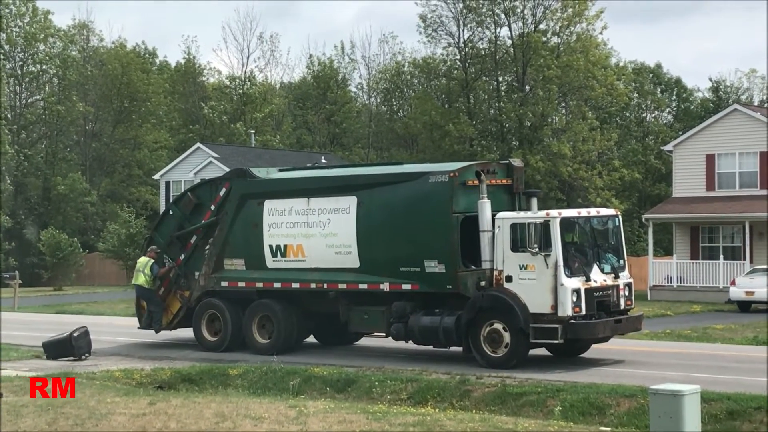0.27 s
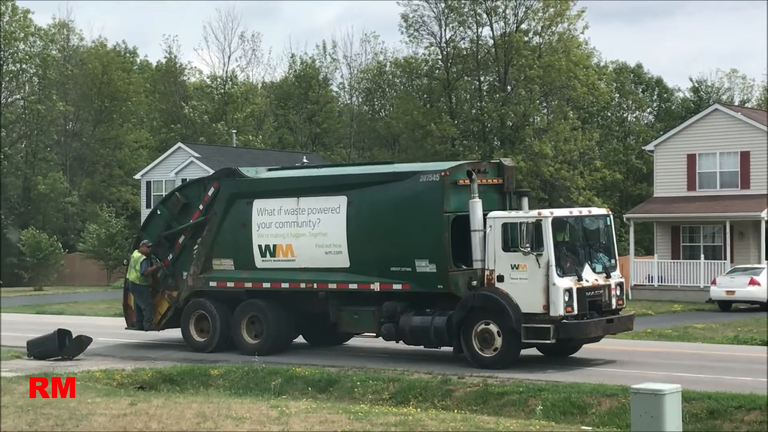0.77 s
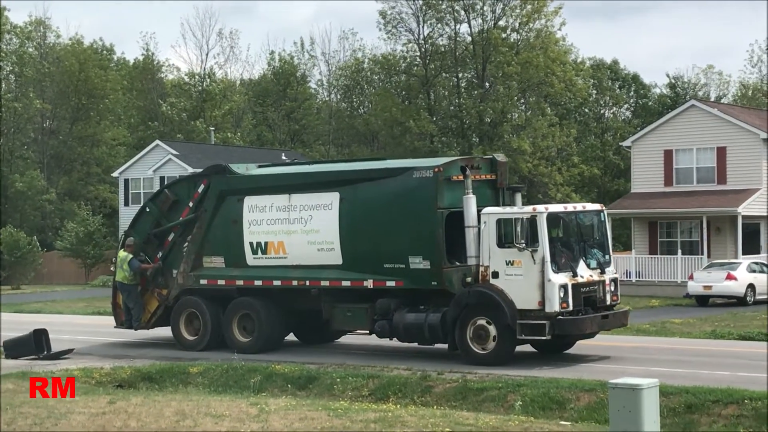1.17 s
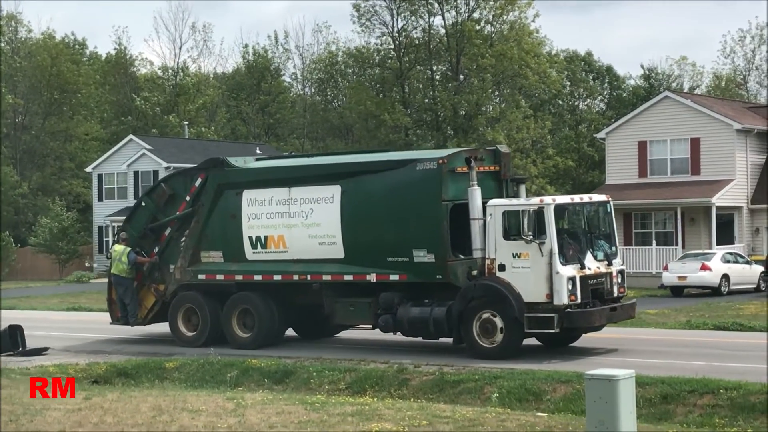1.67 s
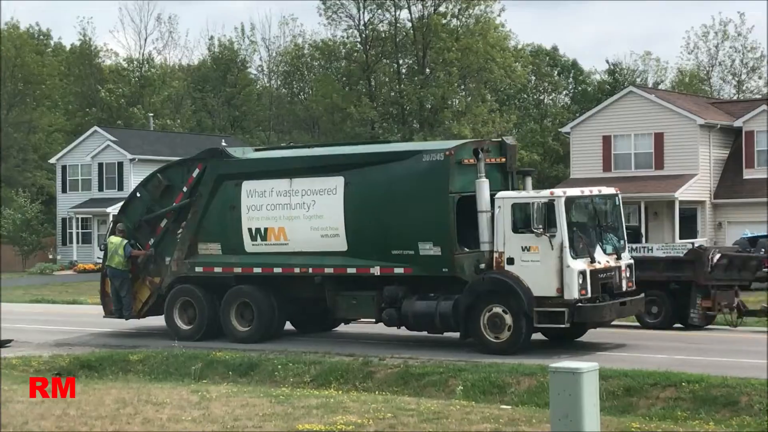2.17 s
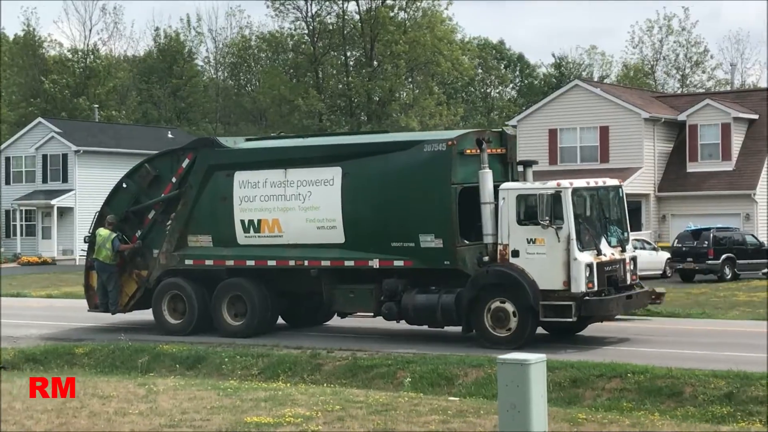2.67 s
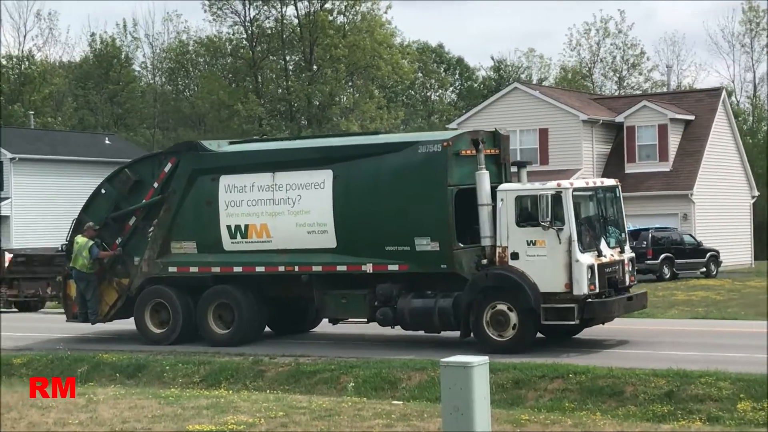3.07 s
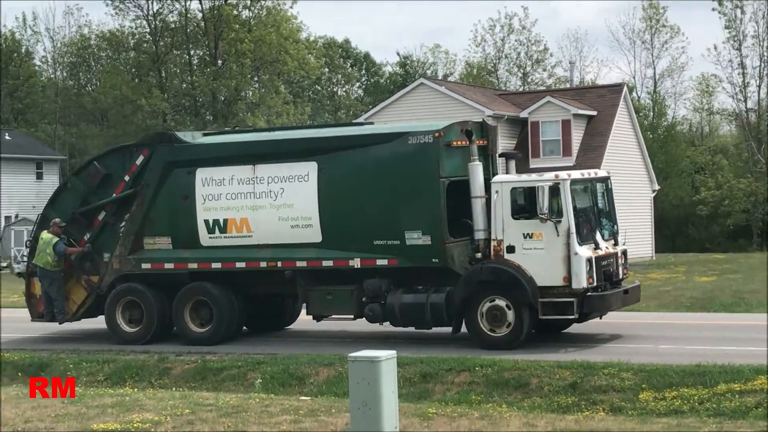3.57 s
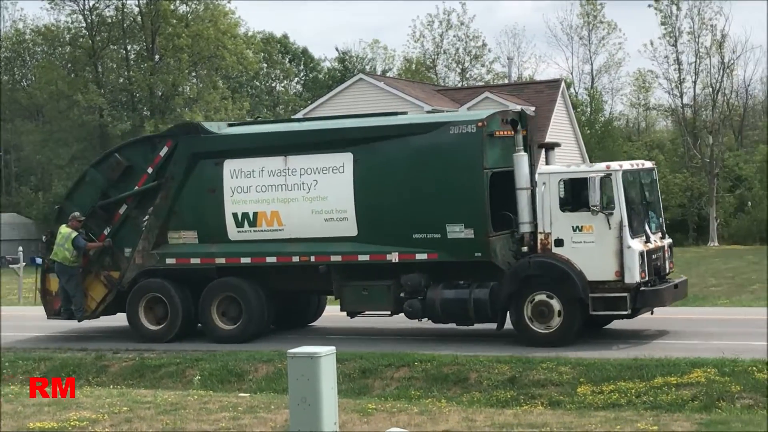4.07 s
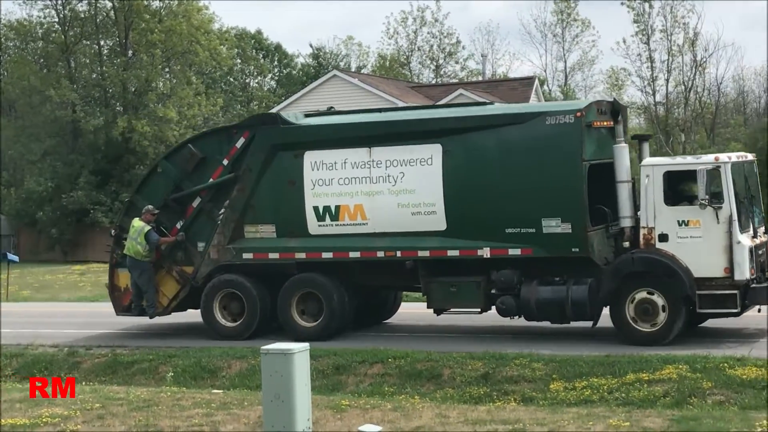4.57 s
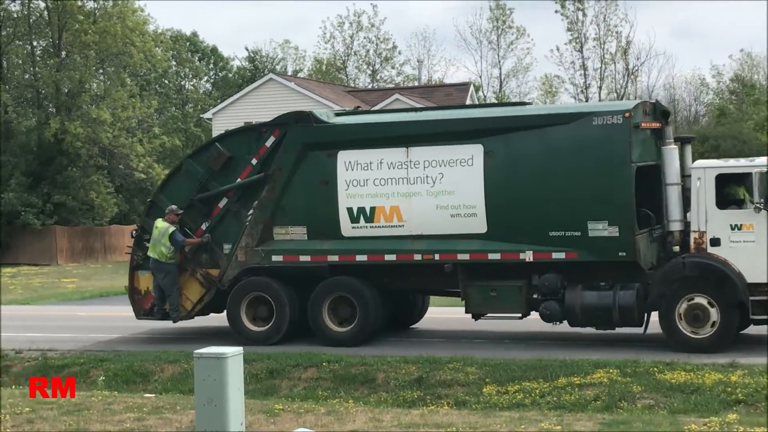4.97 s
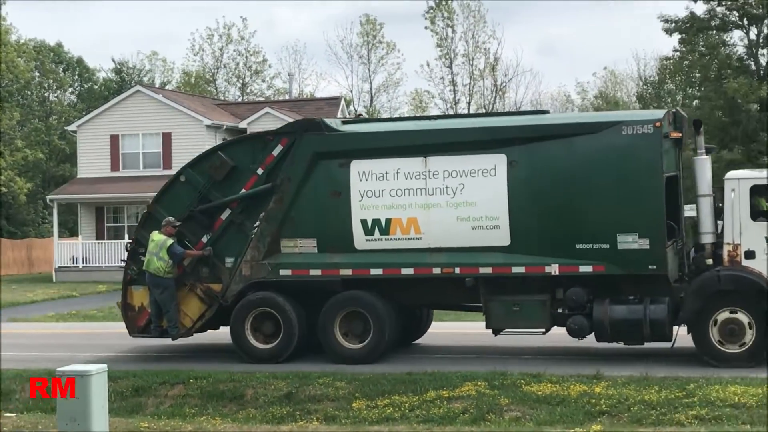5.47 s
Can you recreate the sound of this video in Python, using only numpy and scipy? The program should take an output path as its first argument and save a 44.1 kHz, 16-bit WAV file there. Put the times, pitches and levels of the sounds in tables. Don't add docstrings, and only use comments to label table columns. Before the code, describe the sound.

Heavy diesel truck accelerates along a suburban street, its deep hum rising after soft bumps, with one sharp steel knock, then easing off.

```python
import sys
import numpy as np
from scipy import signal
from scipy.fft import rfft, irfft, next_fast_len
from scipy.io import wavfile

SR = 44100
rng = np.random.default_rng(int(sys.argv[2]) if len(sys.argv) > 2 else 0)


def rack_gain(trim_db):
    fader = np.asarray(trim_db, float)
    return 10 ** (fader / 20)


def int16_out(signal):
    q = np.round(np.clip(np.atleast_2d(signal).T, -1, 1) * 32767)
    wavfile.write(sys.argv[1], SR, q.astype(np.int16))


N = 251811

# (frequency [Hz], density [dB per Hz])
STREET_SPECTRUM = [(18, -40), (30, -3.5), (60, -24.5), (110, -1.5), (150, -9), (200, -6.5), (300, -11.5),
                   (360, -35)]
STREET_DB = -56.5
# (time [s], pitch [Hz], level [dB])
LOW_DRONE_COURSE = [(0, 50.82, -48), (.5, 49.83, -47), (1, 49.62, -52.5), (1.35, 47.2, -53),
                    (1.7, 47.3, -45), (1.9, 47.25, -50), (2.3, 47.3, -48.5), (2.6, 46.8, -58),
                    (3, 45.7, -63.5), (4.72, 44.95, -62.5), (4.86, 45.73, -47), (5.02, 46, -53),
                    (5.25, 45.6, -43), (5.71, 40.7, -57)]
LOW_DRONE_LEAD_RAD = 1.4
SCUFF_EVERY_S, SCUFF_HALF_S, SCUFF_DB = .999, .053, -71

# (time [s], height [dB], frequency [Hz], decay by 60 dB [s])
BODY_BUMPS = [(0.172, -41.5, 140.4, 0.36), (0.18, -43, 81.4, 0.2), (0.2, -45, 234, 0.16),
              (0.62, -61, 229, 0.14), (2, -56, 530, 0.071), (3.4, -45, 332, 0.058), (0.016, -61, 670, 0.13),
              (0.018, -64, 1367, 0.12), (0.11, -66, 866, 0.23), (0.163, -61, 1205, 0.11),
              (0.205, -47, 100, 0.2), (0.182, -43, 100, 0.3), (0.198, -56, 675, 0.1),
              (1.445, -63, 1330, 0.1), (4.39, -66, 1600, 0.062)]
# (time [s], signed height [1], ring [Hz], crack [dB], bright edge [dB])
STEEL_TICKS = [
    (2.1731, 0.054, 553, 0, -10),
    (2.267, 0.0028, 1020, 8, 8),
    (2.322, -0.019, 980, 6.5, -7),
    (3.2496, 0.0037, 2320, 5, -19),
    (3.252, 0.0015, 2580, 6, -21),
]
TICK_T60_S = .012

# (start
# [s], end [s], start pitch [Hz], end pitch [Hz], level [dB])
WHISTLES_AND_WHINES = [(.65, 1.0, 3950, 3960, -83), (1.04, 1.3, 3950, 4010, -76.5), (1.28, 1.45, 3990, 4030, -80),
                       (1.6, 1.72, 4020, 4040, -80), (1.89, 2.32, 3980, 4000, -78), (1.54, 1.8, 4830, 4800, -79),
                       (1.1, 1.55, 4750, 4780, -85), (1.78, 2.25, 4820, 4780, -83), (1.24, 1.5, 3530, 3540, -82),
                       (1.66, 1.76, 3520, 3540, -80), (1.93, 2.25, 3740, 3820, -82), (2.36, 2.62, 4790, 4760, -82),
                       (2.84, 3.18, 4640, 4690, -85), (2.98, 3.08, 4900, 4840, -81), (3.32, 3.45, 4720, 4700, -82),
                       (.25, .62, 4290, 4320, -87), (.1, .7, 3980, 3950, -86), (1.15, 1.5, 4200, 4280, -82),
                       (1.46, 1.63, 4270, 4360, -79), (1.62, 1.95, 4250, 4400, -84), (1.4, 1.95, 4010, 4000, -85),
                       (2.95, 3.3, 3530, 3560, -81), (2.0, 2.62, 3600, 3610, -79.5), (2.5, 2.9, 4990, 5010, -84.5),
                       (2.62, 2.92, 4460, 4500, -85), (2.9, 3.16, 4510, 4540, -83), (2.4, 3.1, 2500, 2620, -85),
                       (2.9, 4.15, 2650, 2550, -83), (4.3, 4.62, 465, 505, -69.5), (4.3, 4.8, 7050, 7150, -95),
                       (-.1, 1.6, 670, 665, -79), (4.85, 5.8, 690, 680, -75), (3.3, 4.25, 640, 620, -79),
               (.05, .95, 950, 985, -82), (3.3, 3.8, 965, 1010, -80), (4.9, 5.7, 970, 960, -82),
               (4.4, 5.2, 1215, 1225, -84), (5.2, 5.75, 1190, 1130, -81), (-.1, .16, 1300, 1370, -83),
               (-.1, .25, 1560, 1570, -85), (4.3, 4.95, 1570, 1560, -83), (4.92, 5.06, 2480, 2650, -82),
               (4.55, 5.75, 3800, 3900, -86), (2.83, 3.15, 4140, 4210, -80.5), (4.4, 5.7, 2540, 2520, -87),
               (5.05, 5.75, 4250, 4200, -85)]
WHISTLE_WIDTH, WHISTLE_TONE = .01, .7
WHISTLE_BEAT = .25

# (frequency [Hz], width [Hz], level [dB])
BLOCK_MODES = [(2206, 220, -10.5), (2532, 515, -4.5), (3700, 1000, 1.5), (4055, 620, 4.5),
               (4570, 920, -3.5), (5360, 5260, -14)]
# (frequency [Hz], density [dB per Hz])
RUMBLE_SPECTRUM = [(200, -54), (340, 1), (388, -3), (529, -7.5), (649, -4), (733, -9), (1210, -11.5),
                   (1390, -14.5), (1590, -15.5), (2190, -19.5), (2400, -20), (3120, -38), (5280, -120)]
SHADE_S, SHADE_HALF_S, SHADE_DB = 2.75, .41, -1.5

# (frequency [Hz], width [Hz], level [dB])
PIPE_MODES = [(61, 22, 12), (109, 85, 4.5), (171, 58, -2), (218, 27, -2), (264, 26, -14), (300, 28, 2.5),
              (502, 110, -2.5)]
TAKE_UP_S, TAKE_UP_HALF_S, TAKE_UP_DB = .25, .11, 10.5
# (sixths of the firing rate [1], level
# [dB])
CYLINDER_LINES = [(3, 4.5), (4, -1), (7, 6), (8, -2), (9, 1.5), (10, -5), (11, 5.5), (13, 2), (14, -3.5),
                  (15, 2), (16, -3.5), (20, -2.5), (21, -13.5), (22, -8.5), (26, 1.5), (28, -6), (30, -2.5),
                  (32, -1.5), (34, -3.5), (36, -2.5), (40, -9.5), (42, -2.5), (48, -2.5)]
# (frequency [Hz], level [dB])
PIPE_COLOUR_CURVE = [(20, -101), (35, -79), (50, -66), (75, -67.5), (100, -65.5), (125, -68), (150, -82.5),
                     (175, -70), (225, -67), (255, -64.5), (290, -63), (335, -70), (380, -85), (600, -88.5)]

# (sixths of the firing rate [1], start [s], end [s],
# level [dB])
ORDER_SWELLS = [(12, .2, .75, -52), (12, .6, 2.25, -54), (18, .1, .55, -58), (24, .1, .7, -63),
                (12, 2.45, 3.7, -58), (12, 3.9, 4.8, -53.5), (12, 4.7, 5.9, -58), (18, .5, 1.05, -56.5),
                (18, 1.8, 2.95, -54.5), (18, 3.1, 3.5, -52), (18, 3.4, 4.3, -63), (18, 4.35, 5.9, -56.5),
                (24, .6, 1.5, -61), (24, 1.55, 1.85, -58), (18, 1.0, 1.8, -66), (30, 3.35, 3.85, -70),
                (32, 4.55, 5.1, -67.5), (24, 2.1, 2.7, -62), (24, 2.7, 3.02, -56), (24, 3.05, 3.56, -53),
                (24, 3.5, 4.3, -56), (30, .45, 1.05, -67), (30, 2.0, 2.3, -65), (30, 2.25, 2.62, -53.5),
                (30, 2.55, 3.3, -63), (24, 4.2, 5.4, -68),
                (26, 1.05, 1.5, -65), (26, 2.7, 3.15, -55.5), (26, 3.15, 3.85, -60), (26, .6, 1.0, -65),
               (28, 2.3, 3.45, -63), (32, 1.9, 2.4, -64), (18.5, .25, .55, -57), (15, .1, .45, -57),
               (22, 3.45, 4.35, -60), (22, 5.42, 5.9, -60), (22, .18, .45, -61), (23, .18, .42, -60),
               (21, .18, .42, -62), (17, 4.2, 4.8, -67), (17, 5.1, 5.7, -66), (15, 2.8, 3.65, -65),
               (21, 1.8, 2.4, -65), (14, 3.75, 4.25, -65), (20, 1.05, 2.3, -65), (20, 2.4, 2.85, -58),
               (20, 3.05, 3.55, -59), (20, 4.05, 5.12, -57.5), (20, 5.2, 5.58, -51.5), (20, 5.45, 5.9, -57),
               (19, 4.0, 4.3, -64), (21, 5.45, 5.9, -59), (21, 1.05, 1.5, -64), (19, 4.3, 4.7, -59),
               (19, 2.9, 3.4, -62), (16, 3.15, 4.35, -59), (16, 4.5, 5.25, -56), (15, 4.95, 5.55, -64),
               (14, .95, 1.35, -63), (14, 1.65, 2.35, -63), (14, 4.65, 5.1, -60), (13, 3.85, 4.45, -56.5),
               (13, 4.8, 5.25, -59), (11, 1.15, 1.8, -63), (11, 2.1, 2.55, -61), (11, 2.75, 3.45, -64),
               (10, .95, 1.8, -60), (10, 2.4, 3.0, -64), (9, .65, 2.05, -62), (9, 2.15, 3.6, -56),
               (9, 3.75, 4.45, -62), (8, 2.55, 3.0, -59), (7, 2.85, 3.9, -55.5), (7, 4.05, 5.9, -54),
               (4, 2.85, 3.95, -54.5), (4, 4.55, 5.9, -58), (3, 3.45, 4.7, -61)]
SWELL_FADE_S, SWELL_WAVER_DB = .11, 1.4
# (firing rate [Hz], level [dB])
PIPE_BOOM = [(47.7, -30.5), (51, -28.5), (64.3, -41.5), (69.3, -31.5), (78, -31.5), (83, -28),
             (89.3, -34.5), (92.3, -50)]

# (time [s], firing rate [Hz])
ENGINE_SPEED = [(0, 34.1), (.25, 33.3), (.5, 38.6), (.75, 42.7), (1.125, 47), (1.75, 52.5), (2.45, 59.4),
                (3, 67.8), (3.5, 75.8), (3.75, 78.6), (4.05, 80.3), (4.25, 83.3), (4.4, 86.9), (4.75, 92.2),
                (5, 91.3), (5.375, 86.6), (5.71, 79.9)]
# (time [s], level against full pull [dB])
THROTTLE_COURSE = [(0, -25), (.27, -22.5), (.52, -10.5), (.97, -20), (1.06, -6), (1.25, -3), (4.45, 0),
                   (4.62, 2.5), (4.72, 0.5), (4.85, 4.5), (5.0, 2), (5.13, -3), (5.38, 2.2), (5.55, -0.5),
                   (5.71, -8.5)]
# (level at 60 firings/s [dB], gain per doubling of speed [dB], share of throttle swing [1])
EXHAUST_LOUDNESS = (-51.5, 5.3, 0.025)
RUMBLE_LOUDNESS = (-65, 0.44, 0.0068)
CLATTER_LOUDNESS = (-72, 1, 0.071)

# (frequency [Hz], density [dB per Hz])
HISS_SPECTRUM = [(2940, -27.5), (5000, -13.5), (5910, -9), (6560, -10), (7600, -13.5), (9490, -10.5),
                 (10500, -15.5), (12300, -9), (13700, -9.5), (15200, -14), (15800, -5), (16200, -25)]
HISS_DB = -77.5
TREBLE_LOSSES = [.363, .4935, .7255, 1.0895, 1.3655, 1.579, 2.210, 2.561, 2.6685, 2.8805, 3.1045, 3.1585,
                 4.3965, 4.545, 4.715]
LONG_LOSSES = [2.210, 3.1045]
LOSS_SAMPLES = 1024
TOP_HZ = 15741


def rms_one(x):
    return x / np.sqrt(np.mean(x ** 2) + 1e-20)


def in_time(rows):
    s, *columns = np.transpose(rows)
    return [np.interp(np.arange(N) / SR, s, c) for c in columns]


def at_hz(points, hz):
    table_hz, table_db = np.transpose(points)
    return np.interp(np.log(hz), np.log(table_hz), table_db)


def bump_in_time(centre_s, half_s):
    return np.exp(-((np.arange(N) / SR - centre_s) / half_s) ** 2)


def drift(rate):
    r = np.exp(-80 * np.pi * rate / SR)
    coarse = rng.standard_normal(N // 40 + 2002)
    slow = signal.lfilter([1], [1, -2 * r, r * r], coarse)[2000:]
    return np.interp(np.arange(N) / 40, np.arange(len(slow)), rms_one(slow))


def filtered(x, order, hz, kind):
    return signal.sosfilt(signal.butter(order, hz, kind, fs=SR, output="sos"), x)


def resonate(x, hz, width):
    r = np.exp(-np.pi * width / SR)
    poles = [1, -2 * r * np.cos(2 * np.pi * hz / SR), r * r]
    return signal.lfilter([(1 - r * r) / 2, 0, (r * r - 1) / 2], poles, x)


def body(x, modes):
    out = 0
    for k, (hz, width, db) in enumerate(modes):
        out = out + rack_gain(db) * (-1) ** k * resonate(x, hz, width)
    return rms_one(out)


def coloured(spectrum):
    hz, db = np.transpose(spectrum)
    size = next_fast_len(N)
    grid = np.maximum(np.arange(size // 2 + 1) * SR / size, 1)
    gain = rack_gain(np.interp(np.log(grid), np.log(hz), db, left=-90, right=-90))
    return rms_one(irfft(rfft(rng.standard_normal(size)) * gain, size)[:N])


def ring(at_s, hz, t60, turn=0.):
    t = np.arange(N) / SR - at_s
    decay = (t >= 0) * rack_gain(-60 * np.clip(t, 0, 2) / t60)
    return decay * np.sin(2 * np.pi * hz * t + turn)


def street():
    return rack_gain(STREET_DB) * coloured(STREET_SPECTRUM)


def low_drone():
    hz, db = in_time(LOW_DRONE_COURSE)
    turn = 2 * np.pi * np.cumsum(hz + .7 * drift(3.2)) / SR + LOW_DRONE_LEAD_RAD
    drone = np.sin(turn) + rack_gain(-21) * np.sin(2 * turn)
    return np.sqrt(2) * rack_gain(db + 1.5 * drift(3.2)) * drone


def scuffs():
    t = np.arange(N) / SR
    away = (t + SCUFF_EVERY_S / 2) % SCUFF_EVERY_S - SCUFF_EVERY_S / 2
    swell = (t > .5) * np.cos(np.pi / 2 * np.clip(away / SCUFF_HALF_S, -1, 1))
    rub = rms_one(filtered(rng.standard_normal(N), 2, [1900, 3600], "band"))
    return rack_gain(SCUFF_DB) * swell * rub


def body_bumps():
    return sum(rack_gain(db) * ring(s, hz, t60) for s, db, hz, t60 in BODY_BUMPS)


def steel_ticks():
    out = 0
    for s, height, hz, crack_db, edge_db in STEEL_TICKS:
        crack = ring(s, 2900, .0011) + 1.08 * ring(s, 1370, .0035) - .19 * ring(s, 5400, .0021)
        edge = ring(s - .00015, 11000, .0005, turn=np.pi / 2)
        struck = rack_gain(crack_db) * crack - ring(s + .00046, hz, TICK_T60_S)
        panel = filtered(struck, 2, [.89 * hz, 5000], "band")
        panel = filtered(panel, 2, 6000, "low")
        out = out + height * (panel + rack_gain(edge_db) * edge)
    return out


def whistles(firings):
    t, out = np.arange(N) / SR, 0
    for start, end, start_hz, end_hz, db in WHISTLES_AND_WHINES:
        width = WHISTLE_WIDTH * start_hz
        fade = np.clip(np.minimum(t - start, end - t) / .035, 0, 1)
        turn = 2 * np.pi * np.cumsum(np.interp(t, [start, end], [start_hz, end_hz])) / SR
        tone = (WHISTLE_TONE + drift(width)) * np.sin(turn) + drift(width) * np.cos(turn)
        out = out + rack_gain(db - 1.8 + 1.6 * drift(20)) * fade * tone
    return out * (1 + WHISTLE_BEAT * np.cos(2 * np.pi * firings))


def clatter(firings, depth=.088):
    beat = 1 + depth * np.cos(2 * np.pi * firings)
    return body(rng.standard_normal(N) * beat * rack_gain(1.2 * drift(16)), BLOCK_MODES)


def rumble():
    level_db = SHADE_DB * bump_in_time(SHADE_S, SHADE_HALF_S) + 1.0 * drift(4.7)
    return rack_gain(level_db) * coloured(RUMBLE_SPECTRUM)


def exhaust(firings):
    fired = np.flatnonzero(np.diff(np.floor(firings)))
    pulses = np.full(N, 1e-18)
    pulses[fired] = rng.standard_normal(N)[fired]
    return rms_one(filtered(body(pulses, PIPE_MODES), 4, [38, 400], "band"))


def unequal_cylinders(firings, firing_hz, waver_db=4.0):
    out = 0
    for sixths, db in CYLINDER_LINES:
        order = round(sixths) / 6
        level_db = db + at_hz(PIPE_COLOUR_CURVE, order * firing_hz) + waver_db * drift(2.1)
        turn = 2 * np.pi * order * firings + .45 * drift(5.7) + 2 * np.pi * rng.random()
        out = out + np.sqrt(2) * rack_gain(level_db) * np.sin(turn)
    return out


def order_swells(firings):
    out = np.zeros(N)
    for sixths, start, end, db in ORDER_SWELLS:
        at = np.arange(int(start * SR), min(int(end * SR), N))
        fade = np.clip(np.minimum(at / SR - start, end - at / SR) / SWELL_FADE_S, 0, 1)
        level = np.sqrt(2) * rack_gain(db + SWELL_WAVER_DB * drift(6.0)[at]) * np.sin(np.pi / 2 * fade)
        turn = 2 * np.pi * sixths / 6 * firings[at] + .7 * sixths ** 2 + .25 * drift(5.5)[at]
        out[at] += level * np.sin(turn)
    return out


def firing_hum(firings, firing_hz, throttle_db):
    level = np.sqrt(2) * rack_gain(at_hz(PIPE_BOOM, firing_hz) + throttle_db)
    return level * np.sin(2 * np.pi * firings)


def truck():
    (firing_hz,), (throttle_db,) = in_time(ENGINE_SPEED), in_time(THROTTLE_COURSE)
    firings = np.cumsum(firing_hz) / SR

    def loudness_db(law):
        db, slope, share = law
        return db + slope * np.log2(firing_hz / 60) + share * throttle_db

    tones = firing_hum(firings, firing_hz, throttle_db) + order_swells(firings)
    pipe_db = loudness_db(EXHAUST_LOUDNESS) + TAKE_UP_DB * bump_in_time(TAKE_UP_S, TAKE_UP_HALF_S)
    pipe = rack_gain(48) * unequal_cylinders(firings, firing_hz) + rack_gain(-7.5) * exhaust(firings)
    noise = rack_gain(loudness_db(RUMBLE_LOUDNESS)) * rumble()
    noise = noise + rack_gain(loudness_db(CLATTER_LOUDNESS)) * clatter(firings)
    return tones + rack_gain(pipe_db) * pipe + noise + whistles(firings)


def scene():
    background = street() + low_drone() + scuffs()
    return (background + body_bumps() + steel_ticks() + truck())[None]


def lose_treble(x):
    out, step = x.copy(), np.arange(-2 * LOSS_SAMPLES, 2 * LOSS_SAMPLES)
    window = np.cos(np.pi * step / (4 * LOSS_SAMPLES)) ** 2 + 1e-6
    upper = signal.sosfiltfilt(signal.butter(4, 650, "high", fs=SR, output="sos"), x)
    line_hz = np.linspace(0, SR / 2, 2 * LOSS_SAMPLES + 1)
    keep = rack_gain(np.interp(line_hz, [600, 1500, 3000, 3900, 4700, 6000],
                         [-16, -23.5, -26.5, -23, -26, -26]))
    for s in TREBLE_LOSSES:
        at = round(s * SR) + step
        lines = rfft(upper[at] * window)
        change = irfft(lines * np.where(np.abs(lines) < keep, 1, -1.5)) / window
        hold = (s in LONG_LOSSES) * LOSS_SAMPLES * .42
        away = np.clip((np.abs(step) - hold) / (.8 * LOSS_SAMPLES), 0, 1)
        depth = 1 - np.sin(np.pi / 2 * np.sin(np.pi / 2 * away) ** 2)
        out[at] -= depth * change
    return out


def low_pass(x):
    return signal.sosfilt(signal.butter(12, 16380, fs=SR, output="sos"), x)


def record(dry):
    hissy = dry[0] + rack_gain(HISS_DB) * coloured(HISS_SPECTRUM)
    mix = lose_treble(filtered(hissy, 2, 26, "high"))
    mix = signal.sosfilt(signal.ellip(10, .5, 60, TOP_HZ, fs=SR, output="sos"), mix)
    mix *= np.clip(np.arange(N)[::-1] / (.004 * SR), 0, 1)
    return low_pass(mix[None])


dry = scene()
out = record(dry)
int16_out(out)
```